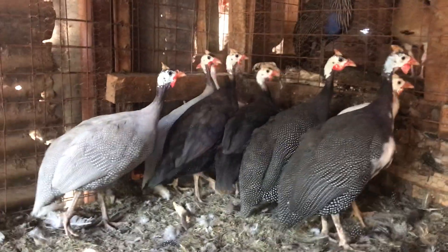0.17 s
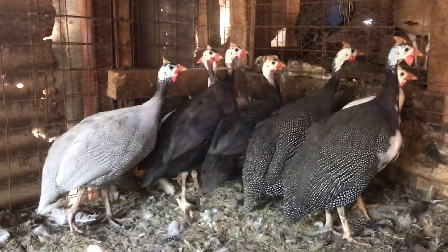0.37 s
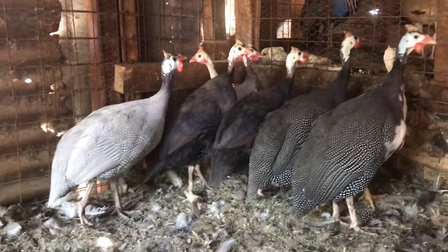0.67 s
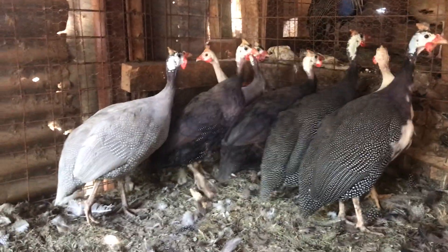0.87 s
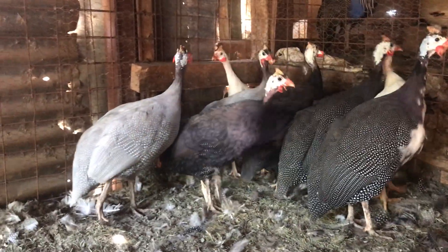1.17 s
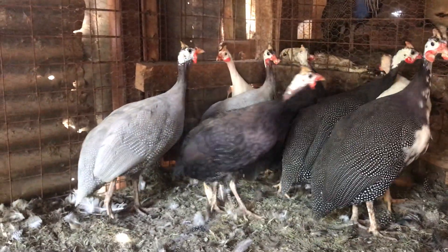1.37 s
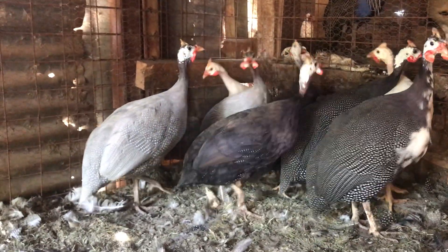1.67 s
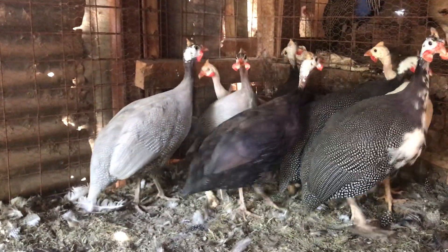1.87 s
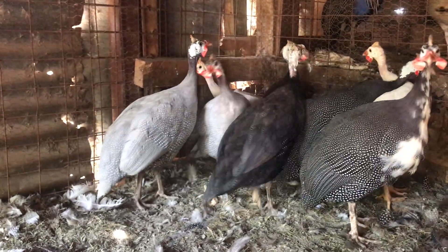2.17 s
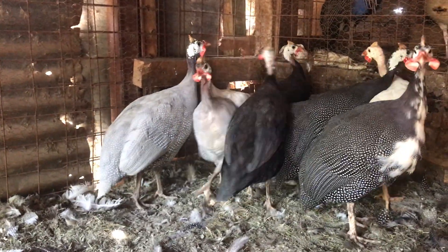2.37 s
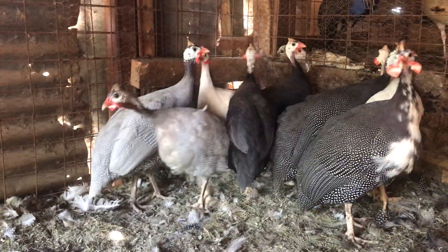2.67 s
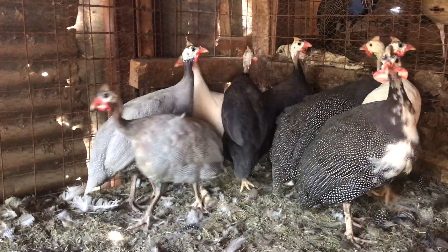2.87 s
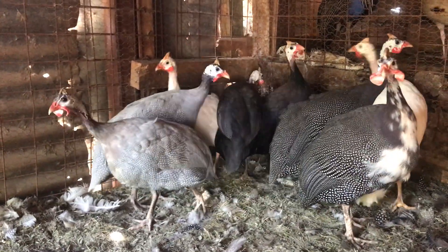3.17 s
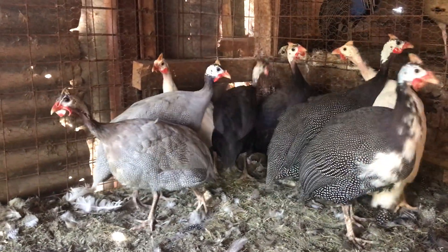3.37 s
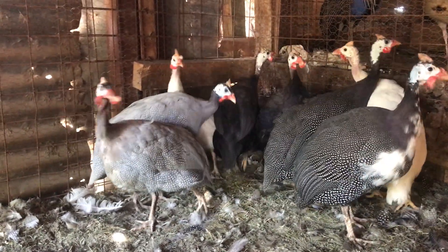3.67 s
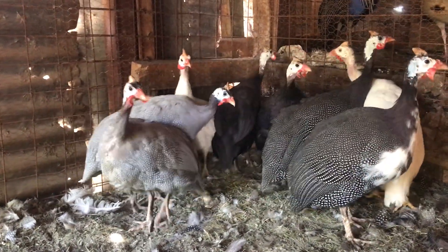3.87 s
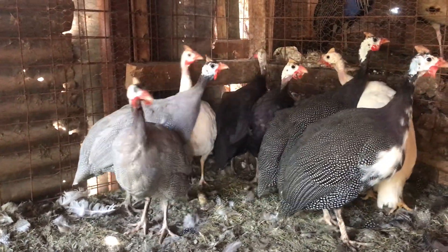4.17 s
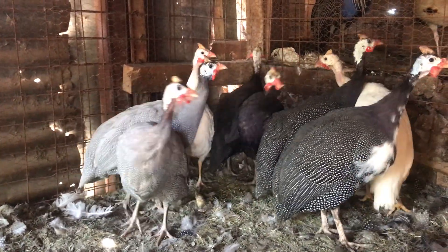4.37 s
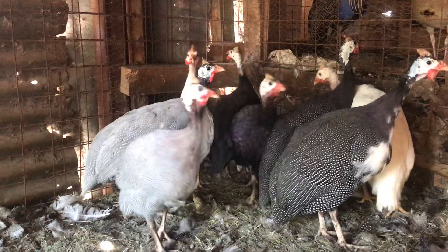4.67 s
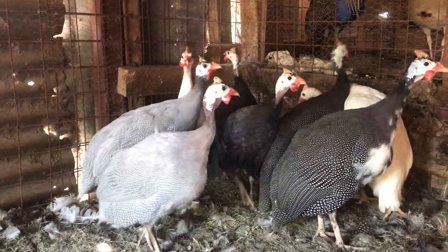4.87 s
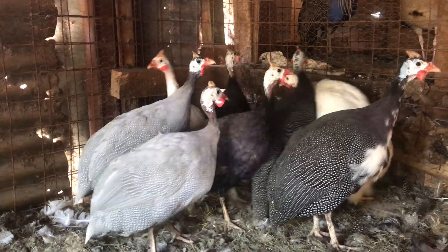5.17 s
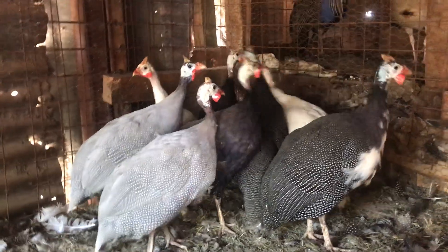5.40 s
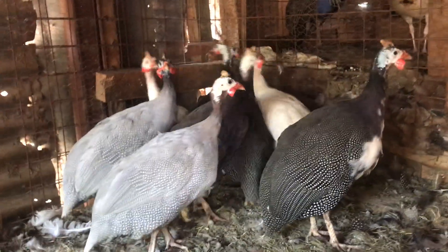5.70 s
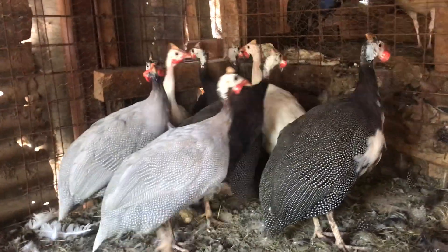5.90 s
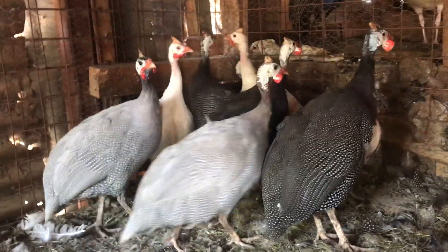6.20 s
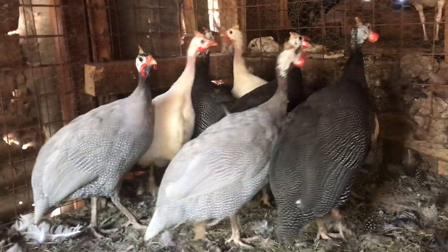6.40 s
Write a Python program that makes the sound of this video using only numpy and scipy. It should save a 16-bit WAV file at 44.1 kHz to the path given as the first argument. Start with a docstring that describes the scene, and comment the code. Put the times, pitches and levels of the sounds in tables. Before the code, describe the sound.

In a close wooden shed, guinea fowl chirp and cry harshly in scattered bursts while feet scuff litter, straw snaps and boards get knocked.

```python
"""A flock of guineafowl on straw in a small shed of boards, tin and wire, heard close for six and a half seconds.
From the start feet stir the litter, crackle over dull scuff, and faint random peeps come back off the walls.
At once come loud birds: the high syrinx voice glides, the low reedy one breaks into a rasp, open beaks hiss.
Knocks soon ring the boards, straws snap, low steps and wing beats thump, soft peeps bend among soft low tones.
After the last knock tin or wire rings near 1040 Hz; close walls echo voices, tones, knocks and snaps."""
import sys
import numpy as np
from scipy import signal
from scipy.fft import rfft, irfft
from scipy.io import wavfile

SR = 44100
rng = np.random.default_rng(int(sys.argv[2]) if len(sys.argv) > 2 else 0)


def generate_wav(sig):
    """Save sig (samples, or channels by samples) to the path in sys.argv[1] as 16-bit PCM at SR."""
    pcm = np.round(np.clip(np.atleast_2d(sig).T, -1, 1) * 32767).astype(np.int16)
    wavfile.write(sys.argv[1], SR, pcm)


N = 288414  # samples


def amp(db):
    """Decibels to a linear factor."""
    return 10 ** (np.asarray(db) / 20)


def evened(x):
    """Scales x to rms 1."""
    return x / np.sqrt(np.mean(x ** 2) + 1e-20)


def read(points, hz):
    """Reads a table of (f/Hz, value) along a logarithmic frequency axis."""
    f, value = np.transpose(points)
    return np.interp(np.log(hz + 1), np.log(f + 1), value)


def add(mix, s, sound):
    """Lays a sound into the mix at s seconds, trimmed where it overhangs."""
    start = round(s * SR)
    sound = sound[max(-start, 0):]
    part = mix[max(start, 0):][:len(sound)]
    part += sound[:len(part)]


def colour(x, points, tilt_db=0):
    """Gives x a spectrum, tilted by so many dB an octave, at rms 1."""
    hz = np.fft.rfftfreq(len(x), 1 / SR)
    gains = amp(read(points, hz) + tilt_db * np.log2(hz + 1))
    return evened(irfft(rfft(x) * gains, len(x)))


def filtered(x, hz, kind):
    """A second-order high or low pass."""
    return signal.sosfilt(signal.butter(2, hz, kind, fs=SR, output="sos"), x)


def wander(size, hz):
    """Random drift, mostly slower than hz, at rms 1."""
    noise = rng.standard_normal(size + SR // 20)  # the extra lets the filter settle
    return evened(filtered(noise, hz, "low")[-size:])


def faded(x):
    """Rounds off both ends over a millisecond or two."""
    return x * signal.windows.tukey(len(x), min(1, SR / 300 / len(x)))


def swell(rise, fall, depth_db, curve, snap=1):
    """One push: time from its loudest moment, and the dB by which it lies under that moment."""
    t = np.arange(-rise, fall, 1 / SR)
    rising = abs(t / rise) ** (curve * snap)
    falling = abs(t / fall) ** curve
    return t, -depth_db * np.where(t < 0, rising, falling)


def patter(per_s, decay_s, bed, spread_db=3.3):
    """Noise in small bursts of uneven size, each sudden and dying fast, over a steady bed."""
    sizes_db = spread_db * np.minimum(rng.exponential(1, N), 3)
    power = (rng.random(N) < per_s / SR) * amp(sizes_db) ** 2
    power = signal.lfilter([1], [1, -np.exp(-1 / (decay_s * SR))], power)
    return rng.standard_normal(N) * np.sqrt(abs(bed) + power / power.mean())


# spectra of crackling straw, scuffed litter and rumbling air: f/Hz, relative level/dB
STRAW = [(200, -52), (900, 5.5), (4000, 2), (8500, -0.5), (10500, -2), (13000, 2.5)]
LITTER = [(20, -8), (55, 5.5), (160, 4), (350, -2), (800, -6.5), (3000, -17), (16000, -47)]
RUMBLE = [(20, -39), (42, -18.5), (70, 3.5), (110, -20), (250, -21), (16000, -94)]
# feet stirring the litter: loudest moment t/s, rise t/s, fall t/s,
# crackle of straw level/dB, dull scuff level/dB (both before the lifts in shuffle)
SHUFFLES = [(0.01, 0.03, 0.99, -61.5, -46.0), (0.85, 0.09, 0.27, -54.5, -52.0),
            (1.01, 0.08, 0.09, -46.5, -45.5), (1.09, 0.03, 0.38, -49.5, -46.5),
            (1.21, 0.02, 1.28, -62.0, -52.5), (1.335, 0.05, 0.06, -53, -54),
            (1.39, 0.16, 0.14, -56.0, -47.0), (1.94, 0.08, 0.06, -52.0, -55.0),
            (2.26, 0.16, 0.42, -56, -47), (2.34, 0.06, 0.04, -49.5, -54.0),
            (2.65, 0.02, 0.91, -69.5, -51.5), (4.07, 0.32, 0.12, -54.5, -48.0),
            (4.82, 0.1, 0.22, -75.0, -54.0), (5.22, 0.04, 0.45, -67.0, -55.0),
            (6.4, 0.73, 0.3, -63.0, -56.5)]
SHUFFLE_DEPTH_DB, SHUFFLE_CURVE = 20, 1.1
IDLE_STRAW_DB, IDLE_SCUFF_DB = -70.5, -59.5  # before the same lifts: the flock is never quite still


def shuffle():
    """Crackling straw over the dull scuff of feet, and a low rumble of air."""
    straw_power = np.full(N, amp(IDLE_STRAW_DB) ** 2)
    scuff_power = np.full(N, amp(IDLE_SCUFF_DB) ** 2)
    for s, rise, fall, straw_db, scuff_db in SHUFFLES:
        t, push_db = swell(rise, fall, SHUFFLE_DEPTH_DB, SHUFFLE_CURVE)
        add(straw_power, s - rise, amp(straw_db + push_db) ** 2)
        add(scuff_power, s - rise, amp(scuff_db + push_db) ** 2)
    straw = colour(patter(per_s=260, decay_s=.0016, bed=1.3), STRAW)
    straw = straw * np.sqrt(straw_power) * amp(4.4 + 1.2 * wander(N, 25))
    scuff = colour(patter(per_s=55, decay_s=.007, bed=.9), LITTER)
    scuff = scuff * np.sqrt(scuff_power) * amp(2.2)
    rumble = amp(-59) * colour(rng.standard_normal(N), RUMBLE)
    return straw + scuff + rumble


# strength of the high voice's octave, by where it falls: f/Hz, level/dB under the fundamental
OCTAVE = [(4200, -22), (5400, -11), (6800, -33)]
PRESSED_DB = -31  # softer tones than this grow ever purer


def high_voice(hz, db, waver, strain, flutter_db=2.4):
    """A nearly pure gliding tone that trembles in pitch and strength; the faster the slide, the rougher."""
    octaves_per_s = abs(np.gradient(np.log2(hz))) * SR
    tremble = (waver + strain * octaves_per_s) * wander(len(hz), 250)
    phase = 2 * np.pi * np.cumsum(hz * (1 + tremble)) / SR
    size = np.sqrt(2) * amp(db + flutter_db * wander(len(hz), 190))
    octave = amp(read(OCTAVE, 2 * hz) + np.minimum(db - PRESSED_DB, 0) / 2)
    return faded(size * (np.sin(phase) + octave * np.sin(2 * phase)))


PEEP_DEPTH_DB, PEEP_CURVE = 11, 2.2
PEEP_TOP = .45  # a peep is loudest at this share of its length
# peeps fainter than this come from the back of the flock, ever more blurred in pitch (share of pitch per dB)
NEAR_DB, BLUR_PER_DB = -55, .0015


def peep(s, length, first_hz, mid_hz, last_hz, db, waver=.002, strain=.002):
    """A wobbly slide that bends smoothly through three pitches."""
    t, push_db = swell(PEEP_TOP * length, (1 - PEEP_TOP) * length, PEEP_DEPTH_DB, PEEP_CURVE)
    bend = np.polyfit([-1, 0, 1], [first_hz, mid_hz, last_hz], 2)
    hz = np.polyval(bend, np.linspace(-1, 1, len(t)))
    blur = BLUR_PER_DB * max(NEAR_DB - db, 0)
    return s, high_voice(hz, db + push_db, waver + blur, strain)


# the rest of the flock, heard only off the walls (level before the echo)
CHATTER_PER_S, CHATTER_DB, CHATTER_SPREAD_DB = 18, -72.5, 3
# range of first pitches, length of a peep, and its last pitch as a share of its first
CHATTER_LOW_HZ, CHATTER_HIGH_HZ, CHATTER_S, CHATTER_FALL = 3300, 5000, .11, .72


def chatter():
    """Faint peeps at random moments and pitches, each with its own bend."""
    out = np.zeros(N)
    for when, high, loud, bend in rng.random((int(CHATTER_PER_S * N / SR), 4)):
        hz = CHATTER_LOW_HZ + high * (CHATTER_HIGH_HZ - CHATTER_LOW_HZ)
        mid_hz, last_hz = hz * CHATTER_FALL ** bend, hz * CHATTER_FALL
        db = CHATTER_DB + CHATTER_SPREAD_DB * (2 * loud - 1)
        add(out, *peep(when * N / SR, CHATTER_S, hz, mid_hz, last_hz, db))
    return out


WHISTLE_DEPTH_DB, WHISTLE_CURVE, WHISTLE_SNAP = 22, 1.25, 1.15


def whistle(s, rise, fall, first_hz, mid_hz, last_hz, level_db, waver=.008, strain=.0007):
    """The high voice slides one way as it swells and another as it fades."""
    t, push_db = swell(rise, fall, WHISTLE_DEPTH_DB, WHISTLE_CURVE, WHISTLE_SNAP)
    hz = np.interp(t, [-rise, 0, fall], [first_hz, mid_hz, last_hz])
    return s - rise, high_voice(hz, level_db + push_db, waver, strain)


# whistles of the high voice: loudest moment t/s, rise t/s, fall t/s,
# first f/Hz, f/Hz when loudest, last f/Hz, level/dB before the bird mix
WHISTLES = [ (.137, .028, .02, 2200, 3100, 2750, -35), (.147, .008, .012, 3000, 2720, 2850, -35),
            (.207, .03, .026, 3850, 3890, 3840, -34.5), (.218, .012, .014, 2800, 2580, 2680, -39),
            (.562, .022, .024, 3100, 3400, 3650, -42), (.586, .005, .014, 2620, 2730, 2480, -27.5),
            (.611, .016, .009, 2500, 2860, 2900, -30), (.628, .006, .012, 2600, 2830, 2950, -27.5),
            (1.147, .022, .016, 2380, 2590, 2560, -29), (1.712, .021, .017, 1800, 2520, 3900, -35),
            (1.768, .014, .01, 2900, 4400, 6000, -50), (1.795, .008, .008, 5300, 3250, 1900, -35.5),
            (2.39, .11, .025, 1930, 2200, 2900, -50), (3.348, .018, .025, 2285, 2520, 2800, -33.5),
            (3.369, .018, .02, 2950, 3490, 3450, -31), (3.388, .024, .022, 2800, 2600, 2650, -40),
            (3.912, .012, .005, 2600, 4150, 5400, -41), (3.942, .006, .007, 5000, 3100, 2600, -30),
            (3.951, .004, .005, 2800, 3200, 3500, -39), (5.309, .026, .016, 1802, 2930, 3350, -37),
            (5.793, .023, .005, 1800, 3650, 3600, -34), (5.804, .008, .012, 3600, 3130, 2950, -25.5),
            (5.976, .05, .025, 2150, 2200, 3200, -52), (6.026, .035, .015, 3250, 3950, 3700, -56),
            (6.12, .022, .035, 2350, 3220, 3000, -53), (6.536, .03, .01, 2700, 3080, 3100, -47), ]
WALL_S, WALL_DB = .0026, -8  # the nearest wall beats against a quick glide


def whistles():
    """Every whistle, with one early reflection from the nearest wall."""
    out = np.zeros(N)
    for row in WHISTLES:
        add(out, *whistle(*row))
    add(out, WALL_S, amp(WALL_DB) * out)
    return out


SIZZLE_FROM_HZ, SIZZLE_FULL_HZ = 7500, 11500  # where a cry's sizzle sets in and is full


def sizzled(points, db):
    """A spectrum with its top raised, in full from SIZZLE_FULL_HZ up."""
    return [(hz, level + np.interp(hz, [SIZZLE_FROM_HZ, SIZZLE_FULL_HZ], [0, db])) for hz, level in points]


def rasp(phase, breath=.55, stumble=.04, flutter_db=2):
    """Driven hard, the voice repeats only every third cycle: ragged lines between the overtones, and some air."""
    n, k = len(phase), np.arange(2, 31)[:, None]  # k counts thirds of the pitch
    cycles = np.gradient(phase) / (2 * np.pi)
    slip = 2 * np.pi * np.cumsum(cycles * stumble * wander(n, 420))
    lines = np.sin(k * (phase + slip) / 3 + 2 * np.pi * rng.random(k.shape))
    return (evened(lines.sum(0)) + breath * rng.standard_normal(n)) * amp(flutter_db * wander(n, 300))


# spectra of the low voice's overtones and of its rasp: f/Hz, relative level/dB
THROAT = [(1100, -3.5), (1450, 2), (2100, -1), (2650, -4.5), (2950, -8), (4000, -9), (4400, -8),
          (5200, -19), (7600, -28), (8900, -19.5), (10500, -47), (12700, -13), (16000, -46)]
RASP = [(300, -88), (900, -24.5), (1500, -4), (2100, -6.5), (3000, -2), (4300, -3), (5200, -12),
        (7500, -24), (9000, -22), (10500, -27), (12500, -29), (16000, -34)]
# a cry swells from this far down and sinks back; the curve rounds its top, the snap shapes its start
CRY_DEPTH_DB, CRY_CURVE, CRY_SNAP = 25, 1.3, 1.75
PITCH_OCTAVES_PER_DB = .001  # pitch rises a little with effort
SMEAR = .9  # stray of a rough cry's overtones, radians per octave above the fundamental


def cry(s, rise, fall, pitch_hz, glide, level_db, rough, bright_db, sizzle_db=0,
        jitter=0.03, waver=0.004, stagger=.008):
    """A reedy stack through the throat; driven hard, its cycles stumble, overtones break up and it sheds noise."""
    t, push_db = swell(rise, fall, CRY_DEPTH_DB, CRY_CURVE, CRY_SNAP)
    hz = pitch_hz * 2 ** (glide * t + PITCH_OCTAVES_PER_DB * push_db)
    db = level_db + push_db
    rough, n = np.clip(rough, 0, 1), len(hz)
    unsteady = jitter * rough * wander(n, 880) + (waver + stagger * rough) * wander(n, 82)
    phase = 2 * np.pi * np.cumsum(hz * (1 + unsteady)) / SR
    k = np.arange(1, 12)[:, None]
    # an open beak lifts the first overtones over the fundamental
    lift_db = bright_db * np.minimum(np.log2(k), 1.2)
    # the top ones need effort as well
    effort_db = .6 * np.minimum(db + 13.5, 0) * np.maximum(np.log2(k / 3), 0)
    throat_db = read(sizzled(THROAT, sizzle_db), k * hz)
    gains = amp(throat_db + lift_db + effort_db) * (k * hz < SR / 2)
    # in a rough cry each overtone strays on its own
    stray = SMEAR * rough * np.log2(k) * np.array([wander(n, 130) for _ in k])
    stack = np.sqrt(2) * (gains * np.sin(k * phase + stray)).sum(0) / np.linalg.norm(gains, axis=0)
    grit = colour(rasp(phase), sizzled(RASP, sizzle_db))
    return s - rise, faded(amp(db) * (np.sqrt(1 - rough ** 2) * stack + rough * grit))


# cries of the low voice: loudest moment t/s, rise t/s, fall t/s, pitch f/Hz, glide [octaves/s],
# level/dB before the bird mix, roughness [0-1], brightness [dB/octave], sizzle level/dB
CRIES = [ (.145, .016, .017, 1455, -6, -23.3, .3, -3, 3), (.159, .008, .024, 1480, -1.5, -33.5, .25, -1, 0),
         (.196, .025, .034, 1470, 1.1, -27.3, .16, 3, 12), (.224, .016, .045, 1450, -1, -39, .75, 0, 9),
         (.563, .025, .025, 1320, 0, -41.5, .8, 12, -2), (.601, .018, .034, 1668, -.5, -28, .7, 10, 2),
         (1.151, .018, .022, 1385, 5.5, -27.5, .55, 13, 5), (1.717, .014, .035, 1483, 1, -44, .75, 8, -3),
         (1.801, .006, .013, 1310, -8, -32, .5, 0, -8), (2.217, .014, .046, 1355, -.8, -33, .05, 14, 1),
         (3.364, .021, .034, 1535, .5, -26.5, .63, 9, -7),
         (4.308, .035, .035, 1170, -1, -51.5, .3, -10, -6), (5.306, .014, .045, 1460, 1.5, -34, .55, 0, 1),
         (5.792, .013, .026, 1365, -1.8, -33.3, .11, 4, 0), (5.813, .009, .021, 1335, -.5, -25.3, .5, 8, 0),
         (6.362, .028, .054, 1303, -.45, -29, .08, 9, -7), (6.494, .084, .034, 1322, .9, -34.8, .1, -1, -7),
         ]


def cries():
    """Every cry of the low voice."""
    out = np.zeros(N)
    for row in CRIES:
        add(out, *cry(*row))
    return out


# spectrum of breath through a beak: f/Hz, relative level/dB
HISS = [(200, -28.5), (800, -0.5), (1040, 7), (1500, -5.5), (2800, -9.5), (6000, -17.5), (7500, -37),
        (16000, -32)]
HISS_DEPTH_DB, HISS_CURVE, HISS_SNAP = 22, .8, 2.2


def hiss(s, rise, fall, level_db, flutter_db=2.8):
    """Air through an open beak: fluttering noise without a tone."""
    t, push_db = swell(rise, fall, HISS_DEPTH_DB, HISS_CURVE, HISS_SNAP)
    size = amp(level_db + push_db + flutter_db * wander(len(t), 104))
    return s - rise, faded(size * colour(rng.standard_normal(len(t)), HISS))


# hoarse hisses: loudest moment t/s, rise t/s, fall t/s, level/dB before the bird mix
HISSES = [(.228, .015, .06, -41), (.562, .085, .07, -41), (6.18, .05, .5, -41)]


def hisses():
    """Every hiss."""
    out = np.zeros(N)
    for row in HISSES:
        add(out, *hiss(*row))
    return out


def near_birds(coupling=0.61):
    """Both voices share one air stream, so the low one puts sidebands on the whistle."""
    low, high, air = cries(), whistles(), hisses()
    high = high * (1 + coupling * np.tanh(low / amp(-29)))
    high = filtered(high, 1200, "high")
    return amp(3) * low + amp(2.1) * high + amp(1.1) * air


# what the boards ring with: f/Hz, relative level/dB, t60 t/s
BOARDS = [(313, -1.5, 0.067), (428, -3, 0.08), (565, -6.5, 0.046), (696.6, 2, 0.041), (852, 3, 0.055),
          (1038, -3.5, 0.073), (1783, -4, 0.047), (2580, 1, 0.056)]
# knocks on the boards: t/s, peak level/dB, centre of the blow's spectrum f/Hz
KNOCKS = [(.279, -27, 1400), (.281, -21, 450), (.378, -17.8, 580), (0.883, -31.5, 760), (.977, -35, 330),
          (1.396, -36, 800), (2.147, -36, 195), (2.185, -28, 450), (2.519, -25.5, 1150), (2.652, -37, 400),
          (2.799, -33, 1600), (2.833, -27, 348), (3.054, -32.5, 417), (3.132, -16.5, 1200),
          (3.193, -40, 330), (3.956, -30, 1600), (4.052, -34.5, 290), (5.224, -37.5, 950),
          (5.655, -38, 230), (6.168, -18.8, 1000)]


def knocks(crack_db=11, crack_s=0.0067, sharpness=0.85, dull_hz=3400):
    """A short crack, a push and the modes of the boards; each blow favours the modes near its centre."""
    out, t = np.zeros(N), np.arange(SR // 4) / SR
    for s, db, centre_hz in KNOCKS:
        ring = sum(amp(mode_db - 60 * t / t60) * np.sin(2 * np.pi * hz * t) for hz, mode_db, t60 in BOARDS)
        dulled = signal.lfilter(*signal.butter(1, dull_hz, fs=SR), rng.standard_normal(len(t)))
        crack = dulled * amp(crack_db) * np.exp(-t / crack_s)
        push = amp(16) * np.sin(2 * np.pi * centre_hz * t) * np.exp(-t * centre_hz)
        blow = signal.lfilter(*signal.iirpeak(centre_hz, sharpness, SR), ring + crack + push)
        add(out, s, amp(db) * blow / abs(blow).max())
    return out


# straws snapping and pecks: t/s, peak level/dB, decay t/s, brightness [dB/octave]
SNAPS = [(.735, -43, .02, 0), (.903, -22.5, 0.008, 0), (2.122, -37, .009, 2.5), (2.702, -37.5, 0.0034, 1.5),
         (2.887, -36, 0.0033, -2), (3.006, -35.5, 0.0038, -0.5), (3.72, -31.5, 0.0036, -4.5),
         (3.782, -35, 0.0037, -5), (3.824, -33.5, 0.0025, -6), (3.897, -36.5, 0.0027, -4),
         (3.955, -22.5, 0.0051, -1), (4.017, -34, .005, 9), (4.068, -35, 0.0084, -2),
         (4.115, -34, 0.0097, -1.5), (4.592, -37, 0.0024, -2), (5.149, -35, 0.011, 2.5)]


def snaps(give=0.4):
    """Dry stalks give way, then break in a quick burst of splinters."""
    out, t = np.zeros(N), np.arange(SR // 10) / SR
    for s, db, decay, bright_db in SNAPS:
        splinters = colour(rng.standard_normal(len(t)), STRAW, bright_db)
        burst = splinters * np.exp(-t / decay) * np.tanh(t / (give * decay))
        add(out, s, amp(db) * burst / abs(burst).max())
    return out


# heavy steps and wing beats: t/s, envelope peak level/dB before a 2 dB lift
THUMPS = [(0.982, -33.5), (1.099, -36), (1.22, -34.5), (2.151, -39), (2.199, -35.5), (2.66, -42),
          (2.79, -41), (3.968, -40), (4.061, -43), (4.822, -43), (6.15, -44)]


def thumps(hz=62, rise=.011):
    """Low pushes of a couple of cycles, each at its own pitch around hz."""
    out, t = np.zeros(N), np.arange(SR // 5) / SR
    for s, db in THUMPS:
        envelope = t / rise * np.exp(1 - t / rise)
        add(out, s, amp(db + 2) * envelope * np.sin(2 * np.pi * hz * rng.uniform(0.87, 1.19) * t))
    return out


# soft peeps that scoop, arch or fall: start t/s, length t/s, first f/Hz, middle f/Hz, last f/Hz,
# level/dB before the scene mix
PEEPS = [ (1.605, .032, 3150, 2580, 2380, -45.5), (1.875, .04, 2700, 2600, 2560, -54),
         (1.92, .05, 2800, 2720, 2680, -55), (2.431, .04, 3250, 3560, 3250, -51),
         (2.437, .04, 3750, 3850, 3600, -57), (2.463, .07, 3100, 2620, 2380, -50),
         (2.565, .07, 3020, 2490, 2950, -49.5), (2.637, .035, 2950, 2720, 2920, -49),
         (2.722, .105, 2920, 2650, 2700, -46.5), (2.812, .035, 2800, 2550, 2250, -51),
         (2.85, .052, 2850, 2450, 2540, -47), (3.045, .06, 2950, 2550, 2300, -57),
         (3.555, .045, 3850, 4000, 3550, -61), (3.59, .04, 3000, 2250, 2050, -59),
         (4.21, .1, 3400, 2750, 2250, -63), (4.393, .085, 3900, 2850, 2450, -61),
         (4.76, .13, 3900, 3000, 2800, -62), (4.96, .13, 4900, 3650, 2900, -67),
         (5.193, .06, 3000, 3850, 3450, -52.5), (5.38, .075, 4300, 3550, 3050, -64),
         (5.82, .17, 2060, 2130, 2200, -56), (5.89, .11, 4400, 4050, 3300, -64),
         (6.033, .072, 3700, 2680, 2400, -50), (6.135, .05, 2950, 2550, 2500, -56), ]


def peeps():
    """The peeps that stand out of the flock."""
    out = np.zeros(N)
    for row in PEEPS:
        add(out, *peep(*row))
    return out


# soft low tones, and last a ring of tin or wire after the last knock:
# loudest moment t/s, length scale t/s (times reach each way), pitch f/Hz, level/dB
SOFT_TONES = [(1.646, .025, 1275, -50), (3.09, 0.052, 1304, -47), (3.288, .05, 1180, -43.5),
              (3.323, 0.035, 1187, -47), (4.483, 0.062, 1507, -47), (6.22, .08, 1042, -42)]


def soft_tones(rough=.14, bright_db=-19, reach=.75, waver=.022):
    """Soft low tones and a ring of tin or wire, each a short swell of the cry's stack with hardly any overtones."""
    out = np.zeros(N)
    for s, length, hz, db in SOFT_TONES:
        add(out, *cry(s, reach * length, reach * length, hz, 0, db, rough, bright_db, waver=waver))
    return out


# the shed's ring: f/Hz, t60 t/s
SHED = [(200, .15), (4500, .135), (14000, .1)]


def shed(x):
    """Close walls give sparse echoes from 3 ms on, each band dying at its own speed."""
    taps = np.zeros(SR // 2)
    at = np.arange(SR // 330, len(taps) - 20, 20)
    # one echo of random sign somewhere in every 20 samples
    taps[at + rng.integers(0, 20, len(at))] = rng.choice([-1, 1], len(at))
    hz, t, z = signal.stft(taps, SR, nperseg=256)
    decay = amp(-60 * t / read(SHED, hz)[:, None])
    tail = signal.istft(z * decay, SR, nperseg=256)[1]
    return signal.fftconvolve(x, tail / np.linalg.norm(tail))[:N]


def scene():
    """Birds, tones, knocks and feet, with the shed's answer to all but the thumps and shuffling."""
    tonal = near_birds() + soft_tones()
    soft = peeps()
    hits = knocks() + snaps()
    echoes = shed(amp(-12.5) * tonal + amp(-5) * soft + amp(-5) * hits + chatter())
    return (tonal + amp(-1.7) * soft + hits + echoes + thumps() + shuffle())[None]


EDGE_HZ = 16000  # top of the band


def record(dry):
    """The microphone sheds the deepest bass; then the band limit."""
    dry = filtered(dry, 32, "high")
    band = signal.firwin(511, EDGE_HZ, window=("kaiser", 9), fs=SR)
    return signal.oaconvolve(dry, band[None], "same")


dry = scene()
out = record(dry)
generate_wav(out)
```